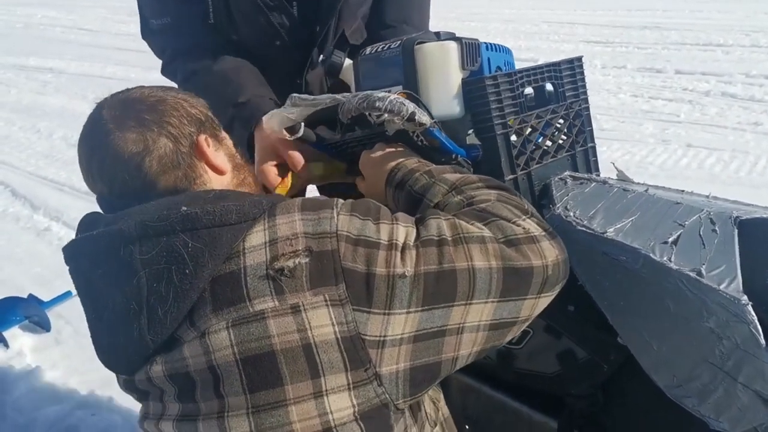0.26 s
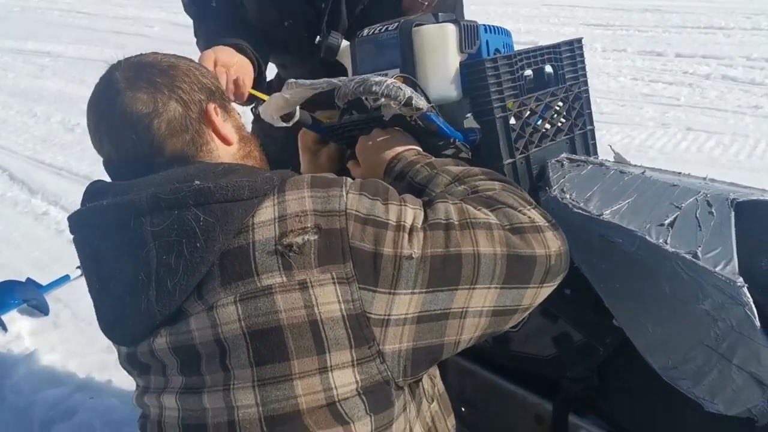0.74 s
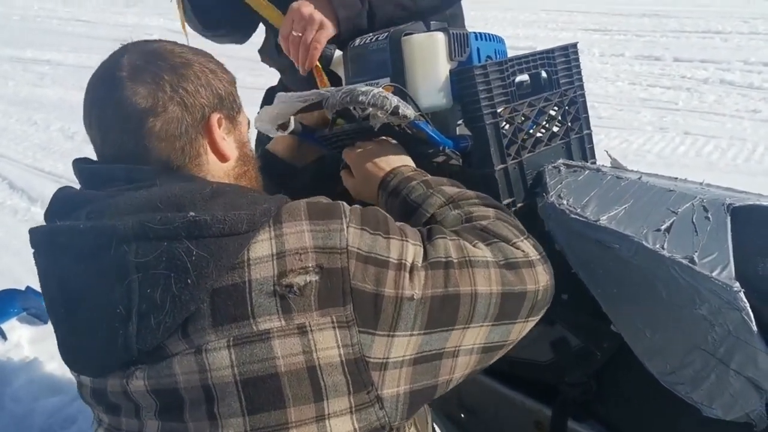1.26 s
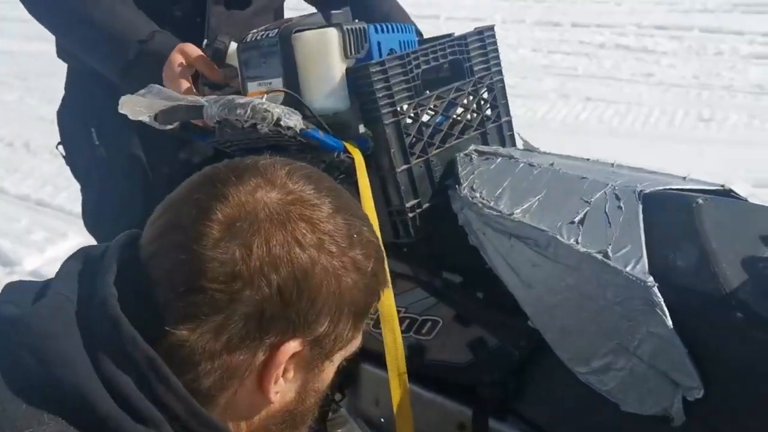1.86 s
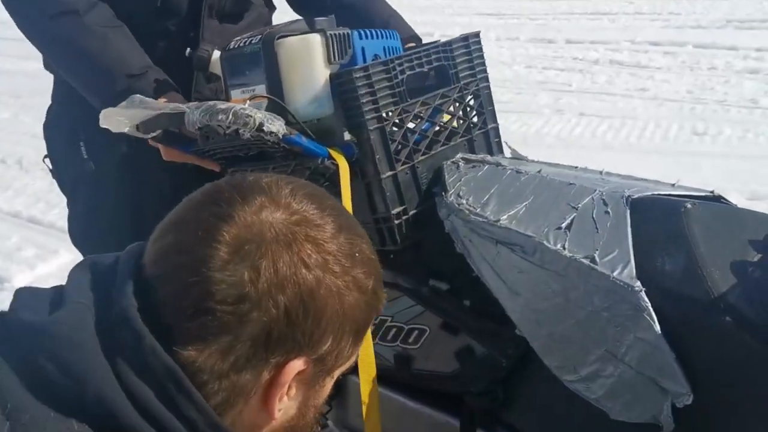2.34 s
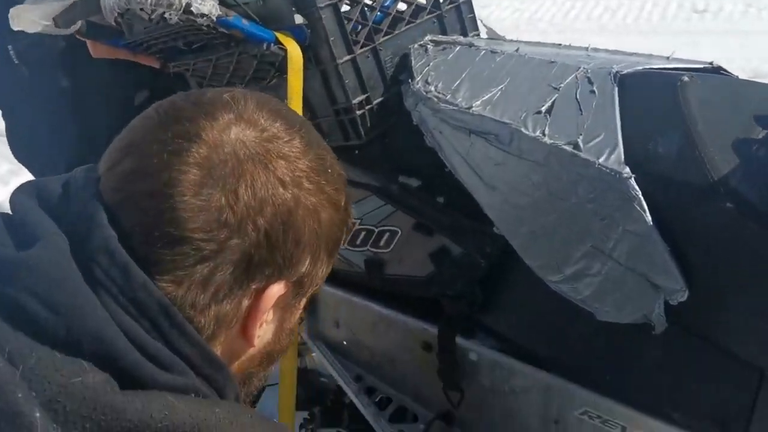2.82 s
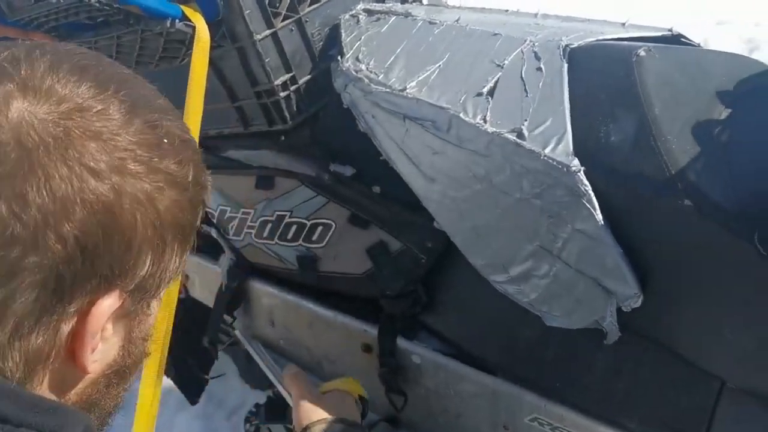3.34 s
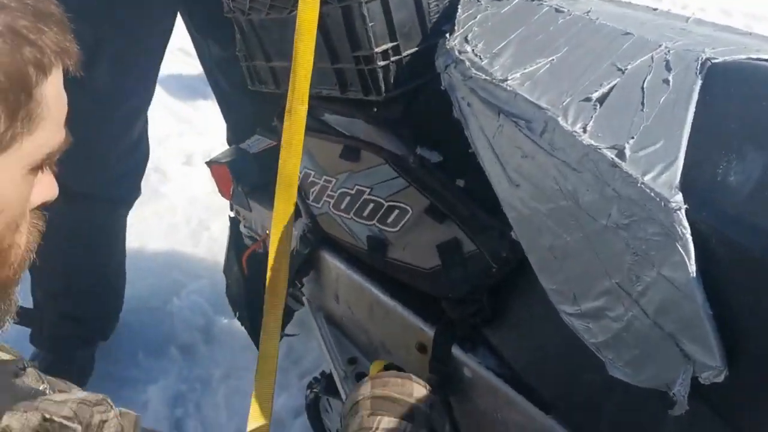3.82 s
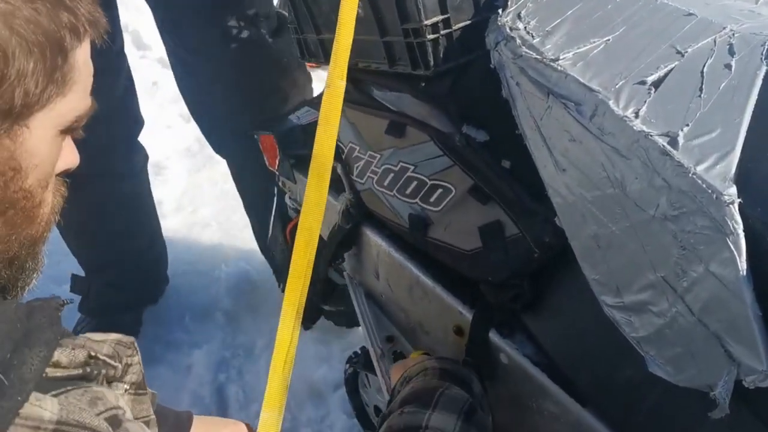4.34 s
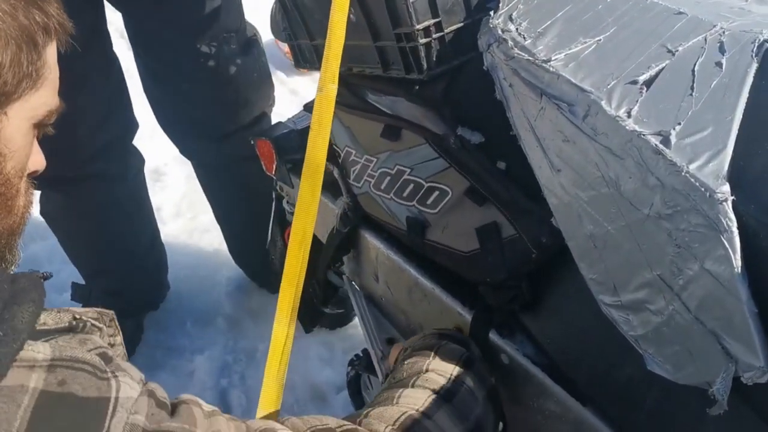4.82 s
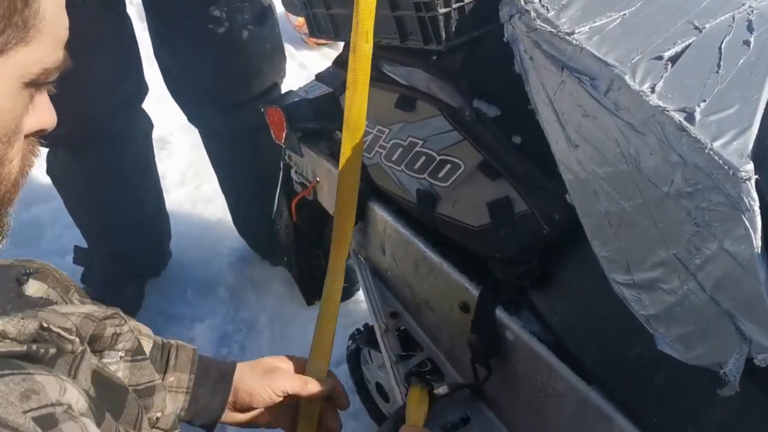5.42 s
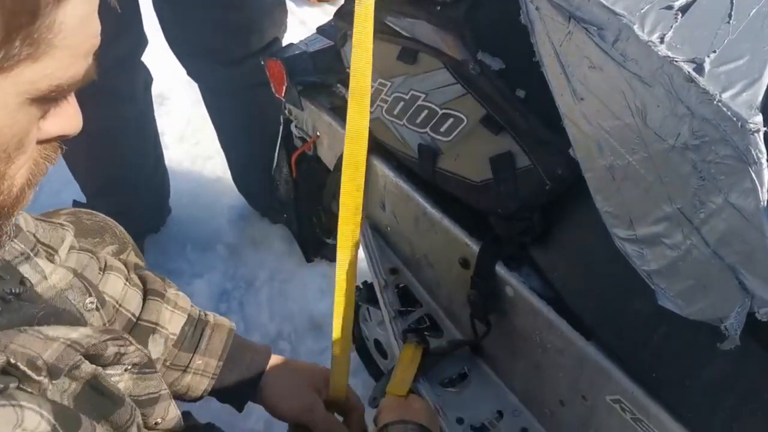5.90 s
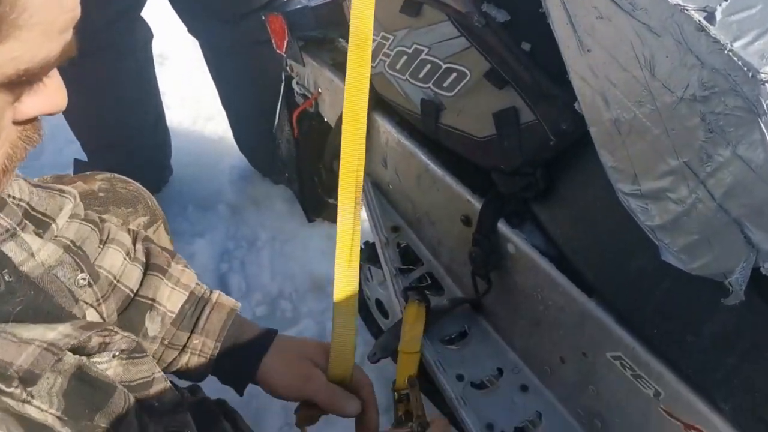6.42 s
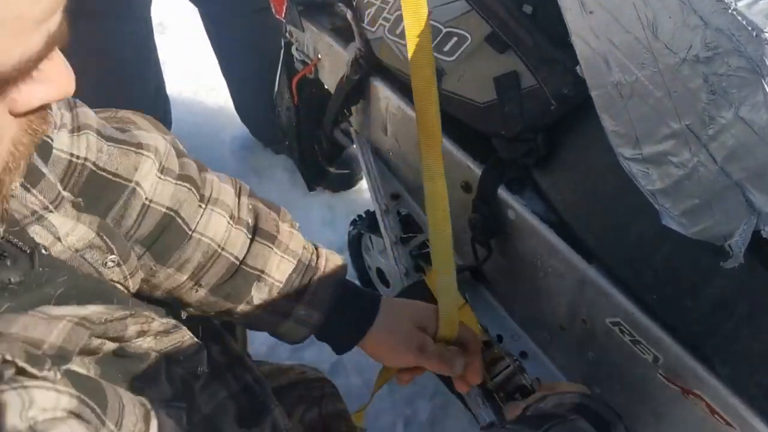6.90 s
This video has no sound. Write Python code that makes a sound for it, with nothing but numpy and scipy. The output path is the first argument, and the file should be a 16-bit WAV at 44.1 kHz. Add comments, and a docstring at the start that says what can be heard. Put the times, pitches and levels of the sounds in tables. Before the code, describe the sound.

Close, rattly snowmobile idle putters roughly outdoors, piston slap and steel ticks throughout; small ratchet clinks, then the engine level suddenly drops near the end.

```python
"""From the start a two-stroke twin snowmobile idles on a frozen lake: even exhaust puffs over an uneven burn,
one clutch knock a turn, piston clatter, steel ticks and a buzzing, singing panel, all driven by the same firings.
A hand-held microphone moves along beside the seat, which shades the exhaust pipe from about 3 s on. A strap ratchet,
steel grains ringing a handle, clinks at 3.7 s, knocks at 5.3 s and clicks three times from 6.3 s.
At 6.6 s the engine level drops sharply, then partly recovers."""
import sys
import numpy as np
from scipy import signal
from scipy.fft import rfft, irfft, next_fast_len
from scipy.io import wavfile
from scipy.ndimage import uniform_filter1d

SR = 44100
rng = np.random.default_rng(int(sys.argv[2]) if len(sys.argv) > 2 else 0)


def digitize_waveform(pressure):
    """Quantize a signal to 16-bit integers and store it at the path in sys.argv[1].

    Rows of a 2-D input are taken as channels; values are limited to [-1, 1].
    """
    field = np.atleast_2d(pressure).T
    bounded = np.clip(field, -1, 1)
    quanta = np.round(bounded * 32767).astype(np.int16)
    wavfile.write(sys.argv[1], SR, quanta)


N = 315743
TIME = np.arange(N) / SR   # s

# The idle speed hunts a little: t/s, firing rate f/Hz
IDLE_SPEED = [(0.0, 51.91), (1.19, 51.71), (1.39, 50.59), (1.79, 52.04), (2.19, 52.19), (2.59, 51.18),
              (2.98, 52.1), (3.58, 50.53), (4.18, 51.59), (4.38, 50.44), (4.77, 51.49), (5.37, 50.89),
              (5.77, 50.97), (5.97, 49.8), (6.76, 53.24), (7.16, 49.78)]
FIRST_STROKE_S = 0.0055
# The burn waxes and wanes at random between these rates
SURGE_LOW_HZ, SURGE_HIGH_HZ = 7.5, 18
# Swing of the burn around its mean, smoother for a while: t/s, level/dB
BURN_SWING = [(0, 4.4), (2.9, 4.0), (3.3, 3.1), (6.3, 3.1), (6.6, 4.4)]
# The hardest burns, each a chug between weak strokes: t/s
HARD_BURNS = [0.14, 0.391, 0.546, 0.778, 0.932, 1.3, 1.437, 1.614, 1.767, 1.922, 2.325, 2.558, 2.733, 2.83,
              2.946, 3.062, 3.648, 3.942, 4.725, 4.999, 5.626, 6.22, 6.548, 6.795]
HARD_BURN_SWINGS, HARD_BURN_REACH = 1.11, 1.8   # height in swings; bell width in strokes

# Resonances, balanced within each part: f/Hz, width/Hz, level/dB
SILENCER_MODES = [(122.5, 25.3, 2.5), (144.7, 11, 2.5), (207.3, 21.3, -7), (398, 54, -12.5),
                  (540, 100, -19.5)]
FRONT_CHAMBER_MODE = [(202.2, 19, 0)]
PIPE_MODES = [(333.3, 56, -2), (495.5, 16, -8.5), (617.8, 20.3, -3.5)]
CLUTCH_MODES = [(689, 71, 6.5), (788, 49, 0.5), (410, 130, -3)]
CRANKCASE_MODES = [(863, 340, 4), (1500, 610, 2), (1700, 210, 4.5), (2150, 270, -5), (2437, 21, -4.5),
                   (2610, 720, -16), (3360, 90, -0.5)]
SMALL_STEEL_MODES = [(3460, 1680, -7), (4645, 430, 2), (5050, 356, -0.5), (6775, 930, -9),
                     (9120, 1200, -17.5), (10900, 820, -14), (12600, 3700, -24)]
PIPE_WALL_MODES = [(1551, 35, 4), (1660, 47, 4.5), (1916, 215, 5.5), (2107, 37, 4), (2429, 31, 5.5),
                   (2594, 28.4, 9), (2755, 87, 5), (3170, 41, -1.5), (3315, 31, -2)]
PANEL_MODES = [(1074, 64, -8), (1199, 117, -13), (1371, 86, -13), (1562, 53, -14.5)]
RATCHET_HANDLE_MODES = [(890, 80, 12.5), (1380, 200, 8.5), (2120, 190, 6), (2660, 260, 5), (3980, 160, -1),
                        (4430, 160, 1), (4940, 280, -1), (5400, 560, -3), (6600, 130, 2), (7360, 1900, -11),
                        (10800, 1600, -12), (13100, 770, -17)]
PANEL_RING_HZ = 1190

# Balance of the engine parts, before ENGINE_DB and the curves below
BOOM_DB, THROB_DB, PIPE_DB, HUM_DB, CLUTCH_DB = -40, -48, -50, -43.5, -53.5
CLATTER_DB, TICKING_DB, SHELL_DB, PANEL_DB = -55.5, -56, -55, -58.5
ENGINE_DB = 4.5   # lifts the whole engine, exhaust puffs included

# The side panel as the microphone moves past: t/s, buzz level/dB, ring level/dB, left port lag t/s
PANEL_PASS = [(0, -8, -53.5, 0.00038), (1.45, -5.5, -55.5, 0.00036), (1.65, 0, -53, 0.00033),
              (3.0, 2, -53.5, 0.00028), (3.3, 0, -54.5, 0.00031), (3.8, 2, -65, 0.00029),
              (5.4, 1, -60.5, 0.00029), (6.5, -1.5, -66, 0.00035), (7.15, 1, -65, 0.00022)]
# The seat comes between the exhaust pipe and the microphone: t/s, level/dB
SEAT_SHADOW = [(2.8, -0.5), (3.4, -0.5), (3.9, -7), (7.15, -8.5)]
HUM_SHADOW = 0.87   # share of the seat's shadow
EXHAUST_RISE = 0.14   # behind the seat the outlet is nearer: it gains this share of the shadow's depth
# Nearness of the clutch: t/s, level/dB
CLUTCH_NEAR = [(1.3, -5), (1.9, 0.5), (2.7, 1.2), (3.2, 2.5), (3.6, 0), (5.3, -1), (6.3, 0.5), (7.15, 1.5)]
# Nearness of the ticking parts: t/s, level/dB
TICKING_NEAR = [(0, 0), (2.2, 0), (3.55, 0.2), (3.9, -1.3), (5.5, -2), (6.4, -2.2), (7.15, -2)]

# Strap hook and ratchet: t/s, level/dB (before the decay sets the loudness), lowest f/Hz, highest f/Hz, t60 t/s
RATCHET_HITS = [(3.653, -38.5, 2300, 5000, 0.026), (5.317, -40.5, 500, 2000, 0.05),
                (6.336, -45.5, 5800, 15000, 0.038), (6.597, -40, 7700, 15000, 0.034),
                (6.9745, -29, 605, 14000, 0.025)]
RATCHET_PAN_DB = 3   # left over right
# The engine level dips: t/s, left level/dB, right level/dB
ENGINE_DIP = [(6.6, -6.5, -5.5), (6.66, -5.5, -3), (6.8, -3.5, -1), (7.15, -4, -1.3)]
DIP_START_S = 6.57
# The two microphone ports colour the sound differently: f/Hz, left minus right level/dB
PORT_COLOUR = [(60, 1), (400, 1.8), (1000, 0.9), (2000, -0.3), (3600, 5), (4500, 5.8), (5600, 4),
               (6700, -6), (8000, 2), (9500, 8.5), (11000, 6.5), (13000, 0)]
PORT_LAG_S = 0.00038
CUTOFF_HZ = 15000


def from_db(db):
    """Decibels to gain."""
    return 10 ** (np.asarray(db) / 20)


def rms_one(x):
    """Scale to an rms of 1."""
    return x / np.sqrt(np.mean(x ** 2) + 1e-20)


def in_time(rows):
    """Turn each dB column of a curve into a gain at every sample."""
    s, *columns = np.transpose(rows)
    return [from_db(np.interp(TIME, s, c)) for c in columns]


def cut(x, hz, kind, order=2):
    """Butterworth high- or low-pass."""
    sos = signal.butter(order, min(hz, .45 * SR), kind, fs=SR, output="sos")
    return signal.sosfilt(sos, x)


def resonate(x, modes):
    """Parallel resonances with alternating signs."""
    out = 0
    for k, (hz, width, db) in enumerate(modes):
        r = np.exp(-np.pi * width / SR)
        poles = [1, -2 * r * np.cos(2 * np.pi * hz / SR), r * r]
        ringing = signal.lfilter([1, 0, -1], poles, x + 1e-18)
        out = out + (-1) ** k * from_db(db) * (1 - r * r) / 2 * ringing
    return out


def clicks(times, sizes):
    """One impulse at each time."""
    at = np.round(times * SR).astype(int)
    inside = (at >= 0) & (at < N)
    return np.bincount(at[inside], (sizes * np.ones(len(at)))[inside], N)


def puffs(times, sizes, width_s):
    """A smooth bell of pressure at each time."""
    around = np.arange(-SR // 50, SR // 50 + 1) / SR
    bell = np.exp(-.5 * (around / width_s) ** 2)
    return signal.fftconvolve(clicks(times, sizes), bell, "same")


def bursts(times, sizes, decay_s):
    """An envelope that jumps at each time and dies away."""
    return signal.lfilter([1], [1, -np.exp(-1 / (decay_s * SR))], clicks(times, sizes) + 1e-18)


def scatter(count, spread_db):
    """Random gains around 1."""
    return from_db(spread_db * np.clip(rng.standard_normal(count), -2, 2))


def rattle(envelope, per_s, hiss, apart):
    """Tiny contacts and hiss under an envelope; a share reaches each port by paths of its own."""
    contacts = (rng.random((3, N)) < per_s / SR) * rng.standard_normal((3, N))
    grains = envelope * (rms_one(contacts) + hiss * rng.standard_normal((3, N)))
    return grains[0] + apart * grains[1:]


def firings():
    """Time, strength and cylinder of each stroke; spent gas from a good burn spoils the next ones, so it surges."""
    s, hz = np.transpose(IDLE_SPEED)
    fired = np.cumsum(np.interp(TIME, s, hz)) / SR
    count = np.arange(int(fired[-1]) + 1)
    times = FIRST_STROKE_S + np.interp(count, fired, TIME)
    surge = signal.butter(2, [SURGE_LOW_HZ, SURGE_HIGH_HZ], "band", fs=hz.mean(), output="sos")
    # twice as many strokes are drawn, so that the filter has settled
    wander = signal.sosfilt(surge, rng.standard_normal(2 * len(count)))[-len(count):]
    burn = np.tanh(rms_one(wander))
    for hard_s in HARD_BURNS:
        after = count - np.argmin(np.abs(times - hard_s))
        grip = np.exp(-.5 * (after / HARD_BURN_REACH) ** 2)
        chug = HARD_BURN_SWINGS * np.cos(np.pi / 2 * after)   # weakest two strokes away
        burn = burn + grip * (chug - burn)
    swing_db = np.interp(times, *np.transpose(BURN_SWING))
    return times, from_db(swing_db * burn), (count + 1) % 2


def exhaust(times, strength, late_s=0.0029, settle_s=0.0235):
    """Each port opening puffs, later after a hard burn; the intake gulp that follows is deeper after a poor one."""
    force = strength / strength.mean()
    puff = from_db(-20) * puffs(times + late_s * np.log(force), force ** 1.08, width_s=0.0016)
    gulp = from_db(-23.5) * puffs(times + 0.0078, force ** -.6, width_s=0.0018)
    flow = puff + gulp
    slow = uniform_filter1d(flow, int(SR * settle_s))   # the slow part of the flow does not radiate
    return cut(slow - flow, 1.9, "high", order=1)


def silencer(times, strength):
    """Gas tumbling through the silencer chambers makes them boom."""
    gas = rms_one(bursts(times, strength ** 0.18, decay_s=0.014)) + .5
    boom = resonate(gas * rng.standard_normal(N), SILENCER_MODES)
    return rms_one(cut(boom, 510, "low"))


def pipe(times, strength):
    """Turbulence after each puff rings the higher modes of the exhaust pipe."""
    gas = rms_one(bursts(times, strength, decay_s=0.032)) + .5
    turbulence = rattle(gas, per_s=2000, hiss=1.63, apart=0.45)
    return rms_one(cut(resonate(turbulence, PIPE_MODES), 960, "low"))


def hum(times, swell_db=3.0, swell_hz=6):
    """The exhaust pipe is tuned to five times the firing rate and hums there in uneven swells."""
    strokes = np.interp(TIME, times, np.arange(len(times)))
    note = np.sin(2 * np.pi * 5 * strokes)
    sway = np.interp(TIME, times, scatter(len(times), spread_db=1.0))
    wander = rms_one(cut(rng.standard_normal(N), swell_hz, "low"))
    swells = from_db(swell_db * np.clip(wander, -2, 1))
    return rms_one(note * sway * swells)


def throb(times, strength):
    """Every puff rings the front chamber of the silencer, which is tuned near four times the firing rate."""
    ringing = resonate(clicks(times + 0.0014, strength ** 1.37), FRONT_CHAMBER_MODE)
    return rms_one(cut(ringing, 360, "low"))


def clutch(times, strength, cylinder):
    """Play in the clutch is taken up with one clean knock a crank turn, and let go with a weaker one."""
    takes_up = cylinder == 0
    sizes = np.where(takes_up, 1, .33) * strength ** 0.25 * scatter(len(times), spread_db=1.4)
    at = times + np.where(takes_up, 0.0037, -0.0022)
    chatter = rms_one(bursts(at, sizes, decay_s=.04) * rng.standard_normal(N))
    blows = rms_one(clicks(at, sizes)) + .45 * chatter
    knocks = resonate(blows, CLUTCH_MODES)
    return rms_one(resonate(knocks, [(644, 600, 0)]))   # the guard rounds off each knock


def clatter(times, strength, cylinder):
    """Pistons slap on every stroke and ring the crankcase; one also touches just before and rebounds after."""
    sizes = strength ** 0.13 * scatter(len(times), spread_db=1.5)
    loose = sizes * (cylinder == 0)
    slaps = bursts(times + 0.0071, sizes, decay_s=0.0025)
    touches = bursts(times + 0.0025, 0.61 * loose, decay_s=0.0048)
    rebounds = bursts(times + 0.015, 0.46 * loose, decay_s=0.0065)
    shake = rms_one(slaps + touches + rebounds) + 1.2
    grains = rattle(shake, per_s=6000, hiss=1.0, apart=0.61)
    return rms_one(cut(resonate(grains, CRANKCASE_MODES), 3060, "low"))


def ticking(times, strength, cylinder):
    """Rollers and small steel parts tick brightly, louder and longer on the stroke that knocks the clutch."""
    sizes = strength ** 0.079 * scatter(len(times), spread_db=2.3)
    knocked = sizes * (cylinder == 0)
    shake = bursts(times + 0.00705, 0.7 * sizes, decay_s=0.0055)
    shake = shake + bursts(times + 0.0035, 0.96 * knocked, decay_s=0.01)
    shake = shake + bursts(times + 0.014, 0.5 * knocked, decay_s=0.0054)
    shake = rms_one(cut(shake, 400, "low", order=1)) + .8
    grains = rattle(shake, per_s=7000, hiss=0.98, apart=2.2)
    return rms_one(cut(resonate(grains, SMALL_STEEL_MODES), 1500, "high"))


def shell(times, jitter_s=0.00015):
    """Each pressure wave pings the thin steel wall of the exhaust pipe, nearly alike from stroke to stroke."""
    at = times + 0.0074 + jitter_s * rng.standard_normal(len(times))
    sizes = scatter(len(times), spread_db=1.3)
    shake = rms_one(bursts(at, sizes, decay_s=.004)) + .6
    buzz = rattle(shake, per_s=2500, hiss=0.8, apart=1.3)
    pings = .8 * rms_one(clicks(at, sizes))
    return rms_one(resonate(pings + rms_one(buzz), PIPE_WALL_MODES))


def panel_ring(times, strength, waver_hz=14):
    """Hard burns set the panel singing in short swells on one slightly wavering note."""
    swell = rms_one(cut(bursts(times - .001, strength ** 2.13, decay_s=0.0079), 34, "low"))
    hz = PANEL_RING_HZ + waver_hz * rms_one(cut(rng.standard_normal(N), 38.2, "low"))
    return swell * np.sqrt(2) * np.sin(2 * np.pi * np.cumsum(hz) / SR)


def panel(times, strength, cylinder):
    """Each firing jolts a body panel, one cylinder harder, and it buzzes after, most after the hard ones."""
    sizes = strength ** 1.55
    shake = bursts(times + 0.013, sizes, decay_s=0.016)
    buzz = rattle(shake, per_s=1200, hiss=0.85, apart=0.94)
    jolts = clicks(times + .0095, sizes * np.where(cylinder == 1, 1, .4))
    return rms_one(resonate(rms_one(jolts) + rms_one(buzz), PANEL_MODES))


def ratchet():
    """Steel meets steel: one hard strike and a short crunch ring the handle."""
    out = 0
    for s, db, low_hz, top_hz, t60 in RATCHET_HITS:
        dying = (TIME >= s) * from_db(-60 * np.clip(TIME - s, 0, .2) / t60)
        strike = clicks(np.array([s + 0.00044]), 7.8)
        crunch = rattle(dying, per_s=8000, hiss=0.97, apart=0.98)
        ringing = resonate(strike + crunch, RATCHET_HANDLE_MODES)
        clack = cut(cut(ringing, low_hz, "high"), top_hz, "low")
        out = out + from_db(db) * rms_one(clack) * np.sqrt(np.mean(dying ** 2))
    return out


def at_ports(x, lag_s):
    """A sound from the right reaches the left port later."""
    left, right = np.broadcast_to(x, (2, N))
    return np.array([np.interp(TIME - lag_s / 2, TIME, left), np.interp(TIME + lag_s / 2, TIME, right)])


def scene():
    """All engine parts follow one crank, off to the right; the panel's lag shifts as the microphone passes."""
    times, strength, cylinder = firings()
    past_seat, = in_time(SEAT_SHADOW)
    clutch_near, = in_time(CLUTCH_NEAR)
    ticking_near, = in_time(TICKING_NEAR)
    s, buzz_db, ring_db, lag_s = np.transpose(PANEL_PASS)
    buzzing, ringing = in_time(np.transpose([s, buzz_db, ring_db]))

    outlet = exhaust(times, strength) + from_db(BOOM_DB) * silencer(times, strength)
    outlet = outlet + from_db(THROB_DB) * throb(times, strength)
    low = outlet * past_seat ** -EXHAUST_RISE
    low = low + from_db(PIPE_DB) * past_seat * pipe(times, strength)
    low = low + from_db(HUM_DB) * past_seat ** HUM_SHADOW * hum(times)
    low = low + from_db(CLUTCH_DB) * clutch_near * clutch(times, strength, cylinder)

    metal = from_db(CLATTER_DB) * clatter(times, strength, cylinder)
    metal = metal + from_db(TICKING_DB) * ticking_near * ticking(times, strength, cylinder)
    metal = metal + from_db(SHELL_DB) * past_seat * shell(times)

    side = ringing * panel_ring(times, strength)
    side = side + from_db(PANEL_DB) * buzzing * panel(times, strength, cylinder)

    engine = at_ports(low + metal, PORT_LAG_S) + at_ports(side, np.interp(TIME, s, lag_s))
    dip = np.array(in_time([(DIP_START_S, 0, 0), *ENGINE_DIP]))
    pan = from_db([[RATCHET_PAN_DB / 2], [-RATCHET_PAN_DB / 2]])
    return from_db(ENGINE_DB) * engine * dip + ratchet() * pan


def record(dry):
    """Each port adds its own colour; the top is cut."""
    hz, tilt_db = np.transpose(PORT_COLOUR)
    size = next_fast_len(N + SR // 10)
    bins = np.maximum(np.fft.rfftfreq(size, 1 / SR), 1)
    tilt = np.interp(np.log(bins), np.log(hz), tilt_db)
    coloured = irfft(rfft(dry, size) * from_db([tilt / 2, -tilt / 2]), size)[:, :N]
    steep = signal.ellip(10, .1, 90, CUTOFF_HZ, fs=SR, output="sos")
    return signal.sosfilt(steep, coloured)


dry = scene()
out = record(dry)
digitize_waveform(out)
```